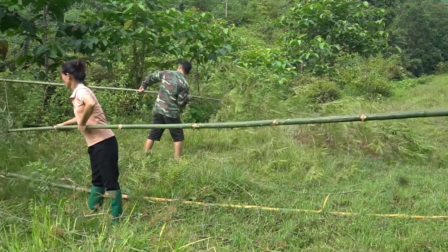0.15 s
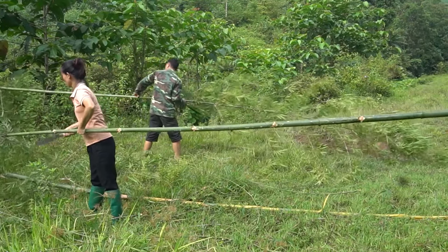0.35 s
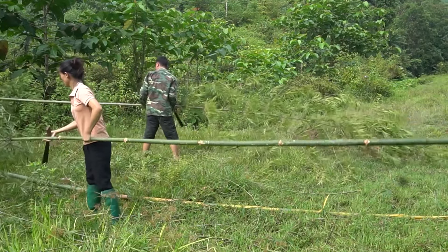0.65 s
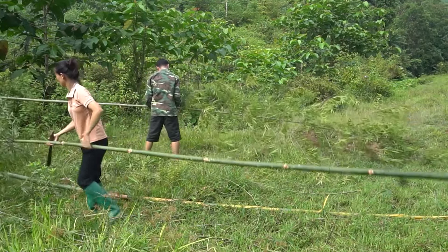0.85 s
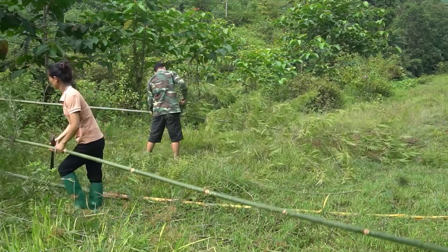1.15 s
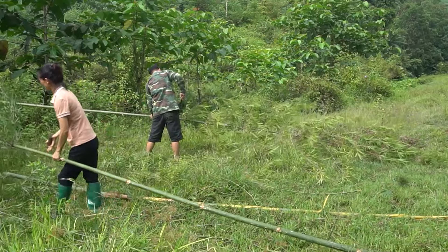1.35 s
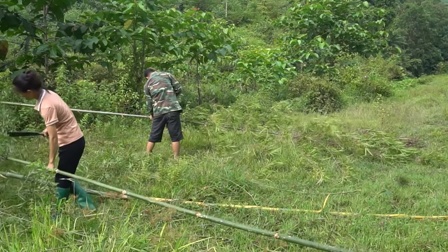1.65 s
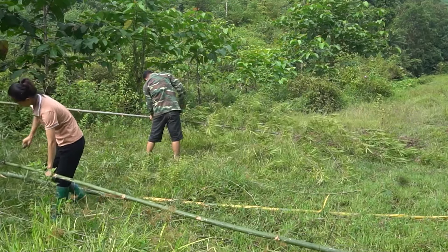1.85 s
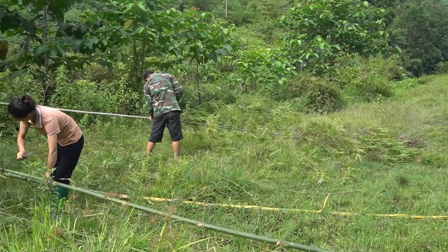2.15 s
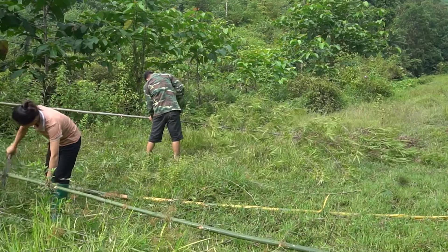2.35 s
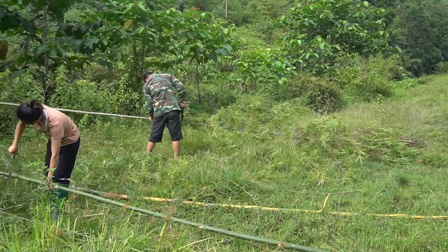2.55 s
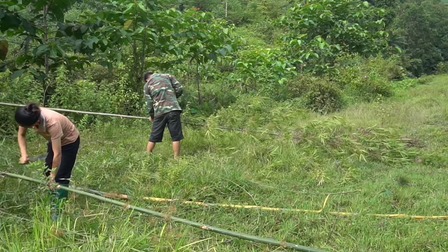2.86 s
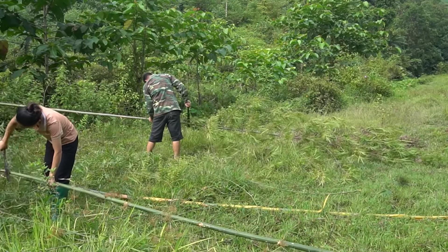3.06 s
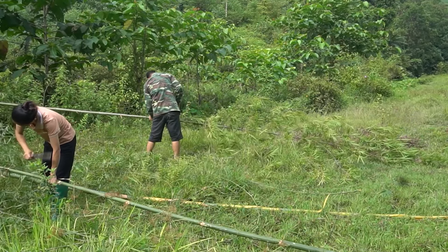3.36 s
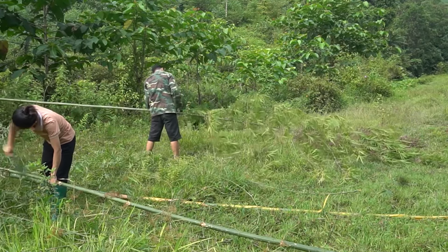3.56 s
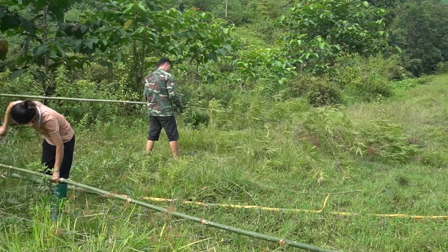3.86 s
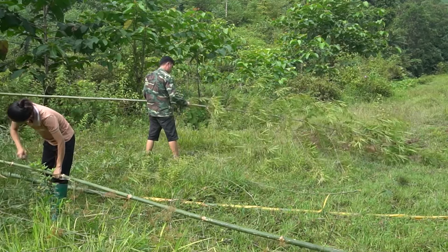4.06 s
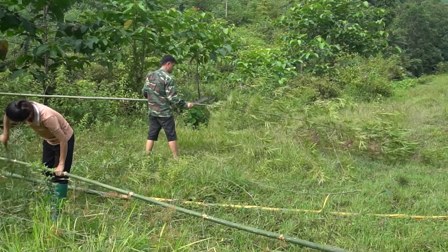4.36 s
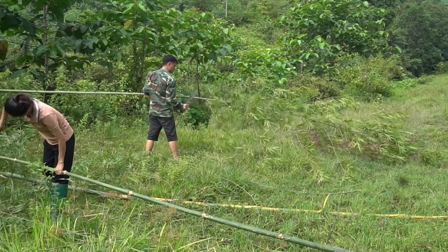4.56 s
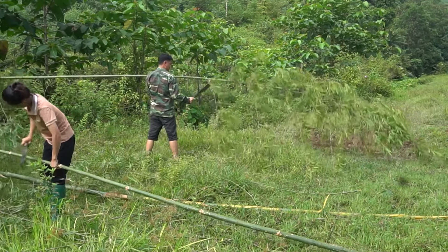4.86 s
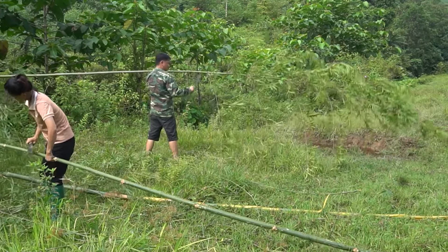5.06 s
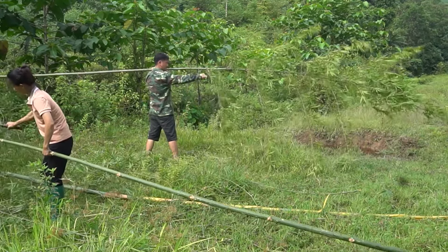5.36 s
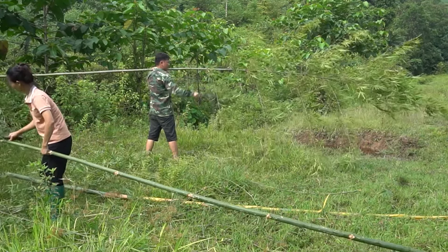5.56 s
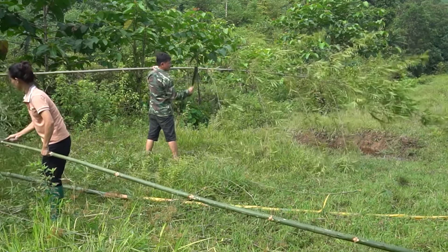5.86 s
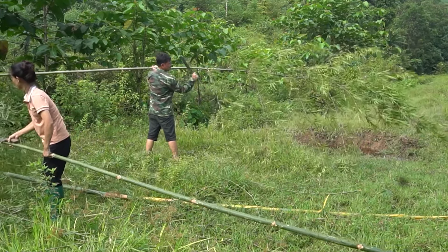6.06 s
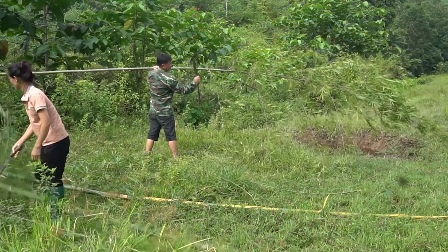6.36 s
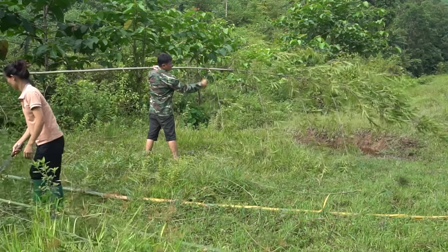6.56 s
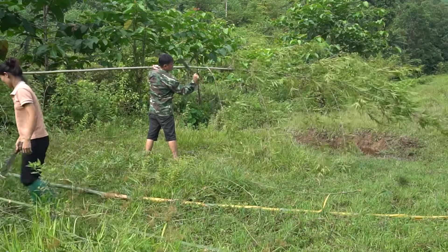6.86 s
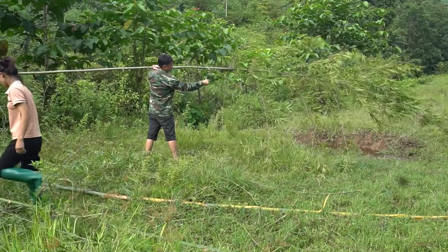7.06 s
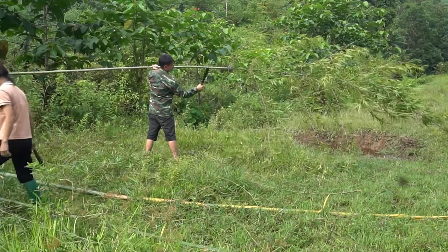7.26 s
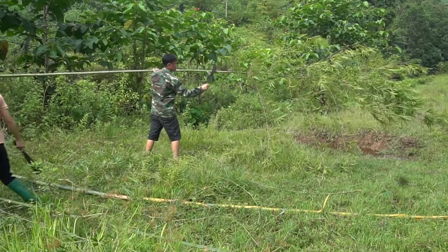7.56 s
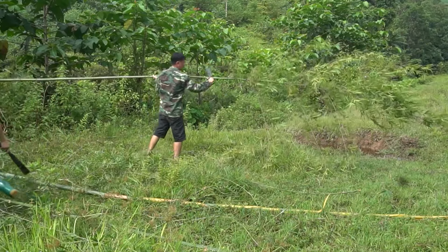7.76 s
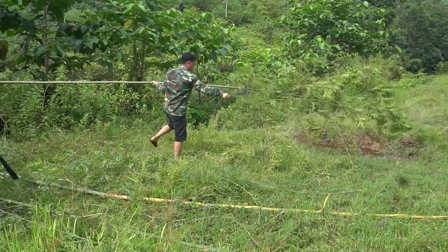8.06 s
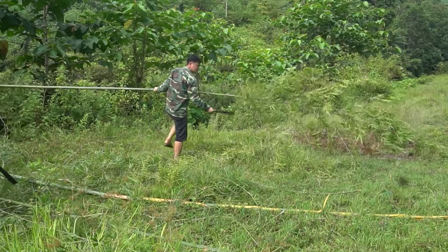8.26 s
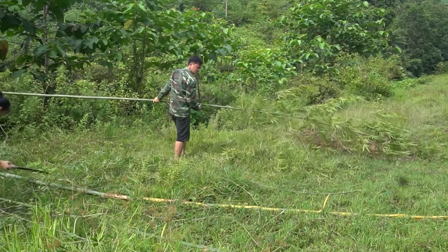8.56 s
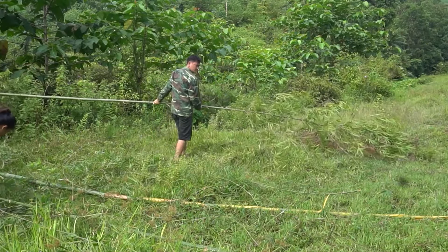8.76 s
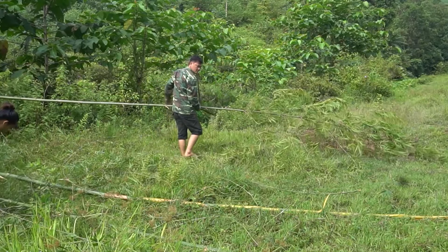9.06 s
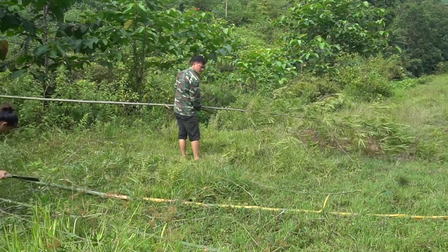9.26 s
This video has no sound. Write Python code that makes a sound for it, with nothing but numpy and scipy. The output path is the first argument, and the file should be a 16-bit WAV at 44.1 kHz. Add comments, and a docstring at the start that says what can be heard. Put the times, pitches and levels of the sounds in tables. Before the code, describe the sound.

A crack opens the scene, then a short lull with dragging and rustling before loud chops begin at two seconds. Blows follow irregularly, thickest with splintering and leaf swish around six and a half seconds, then a heavy pair at eight and a last light cluster near nine. Bamboo knocks hollowly, blades ping briefly. Steady insect buzz surrounds everything; the microphone is outdoors, fairly near, hearing the chopping slightly left.

```python
"""Leaves hiss, poles drag through grass and insects drone over a low rumble, all filtered and modulated noise.
Then heavy blades trim two bamboo poles, slightly to the left. Each crack is a burst of spiky noise with
damped pole-wall modes; it shakes twigs and leaves (decaying noise), and twigs tap the pole.
Late hollow knocks are sine packets with a noise rattle; some blows ring damped steel modes.
The trees return a faint diffuse noise tail."""
import sys
import numpy as np
from scipy import signal
from scipy.fft import rfft, irfft, next_fast_len
from scipy.io import wavfile
from scipy.ndimage import map_coordinates

SR = 44100
rng = np.random.default_rng(int(sys.argv[2]) if len(sys.argv) > 2 else 0)


def master(y):
    """Save y as 16-bit WAV."""
    cut = np.clip(np.atleast_2d(y).T, -1, 1)
    pcm = np.round(cut * 32767)  # scale
    wavfile.write(sys.argv[1], SR, pcm.astype(np.int16))


N = 414981


def amp(db):
    """dB to amplitude factor."""
    return 10 ** (np.asarray(db) / 20)


def unit(x):
    """Scale to rms 1."""
    return x / np.sqrt(np.mean(x ** 2) + 1e-20)


def peak(x):
    """Scale to peak 1."""
    return x / np.abs(x).max()


def along(points, hz):
    """Interpolate (Hz, value) points on a log frequency axis."""
    f, v = np.transpose(points)
    return np.interp(np.log(hz + 1), np.log(f + 1), v)


def curves(rows):
    """One value per sample for each column after the time."""
    s, *cols = np.transpose(rows)
    return [np.interp(np.arange(N) / SR, s, c) for c in cols]


def wobble(knots_per_s):
    """A smooth random curve."""
    knots = rng.standard_normal(int(N * knots_per_s / SR) + 4)
    return map_coordinates(knots, [np.arange(N) * knots_per_s / SR])


def filtered(x, response):
    """Multiply the spectrum of x by a response of frequency."""
    m = next_fast_len(N + 8192)
    hz = np.fft.rfftfreq(m, 1 / SR)
    return irfft(rfft(x, m) * response(hz), m)[..., :N]


def band(x, lo_hz, hi_hz):
    """Causal band-pass."""
    sos = signal.butter(2, [lo_hz, hi_hz], "bandpass", fs=SR, output="sos")
    return signal.sosfilt(sos, x)


def add(track, s, sound):
    """Mix a sound into the stereo track at time s."""
    start = round(s * SR)
    track[:, start:start + sound.shape[-1]] += sound


def ring(modes, t, scatter_db, weight_db=lambda hz: 0, turns=1):
    """Damped modes with random strengths, their phases scattered over turns of a cycle."""
    total = 0
    for hz, db, t60 in modes:
        level_db = db + weight_db(hz) + scatter_db * rng.standard_normal()
        phase = 2 * np.pi * (hz * t + turns * rng.random())
        total = total + amp(level_db - 60 * t / t60) * np.sin(phase)
    return total


# Left-right likeness of far sounds. Each row: frequency in Hz, correlation from 0 to 1.
FAR_LIKENESS = [(60, 0.81), (290, 0.98), (640, 0.44), (1400, 0.54), (3100, 0.047), (15000, .1)]


def rush(spectrum, grain_db=0, knots_per_s=100, likeness=FAR_LIKENESS):
    """Shaped stereo noise of rms 1, its level flickering; mid and side shares set the left-right likeness."""
    pair = rng.standard_normal((2, N)) * amp(grain_db * wobble(knots_per_s))

    def mid_side_response(hz):
        turn = np.arccos(np.clip(along(likeness, hz), -1, 1)) / 2
        return amp(along(spectrum, hz)) * [np.cos(turn), np.sin(turn)]

    mid, side = filtered(pair, mid_side_response)
    return unit(np.array([mid + side, mid - side]))


# Movement of leaves and poles. Each row: time in seconds, leaf hiss level in dB, drag level in dB.
LEAF_DRAG_LEVELS = [(0, -39.5, -45.5), (.3, -45, -41.5), (.72, -42.5, -44.5), (.88, -47, -50.5),
                    (1.05, -50.5, -48), (1.26, -48.5, -44.5), (1.4, -46, -49.5), (1.75, -49.5, -57.5),
                    (2.46, -49.5, -55), (2.62, -44, -36.5), (2.86, -50.5, -48.5), (3.72, -43, -63),
                    (3.86, -46, -48.5), (4.35, -44, -53), (4.78, -39, -46), (5.2, -49.5, -57),
                    (5.42, -39, -49), (5.95, -54, -65), (6.24, -51, -47.5), (6.58, -32.5, -39.5),
                    (6.84, -41, -43.5), (7.25, -45, -52), (7.45, -42.5, -50), (7.75, -50.5, -51.5),
                    (8.52, -41, -47.5), (8.9, -46.5, -56), (9.41, -48.5, -53.5)]
# Spectra of leaf hiss, drag and rumble. Each row: frequency in Hz, relative density in dB per Hz.
HISS_SPECTRUM = [(2500, -32), (4000, -5), (6500, -3), (8000, 0.5), (9400, -2), (11000, -1), (14000, -4),
                 (16000, -9)]
DRAG_SPECTRUM = [(350, 4), (700, -0.5), (1500, 1), (2800, 4.5), (4500, -7.5), (7000, -6.5)]
RUMBLE_SPECTRUM = [(15, -53), (25, -63), (128, -12), (161, -18), (212, -1.5), (238, 1.5), (289, -4.5),
                   (334, -8.5), (628, -24.5), (681, -10.5), (762, -22.5), (1020, -20), (1200, -58.5),
                   (1560, -74), (2640, -120)]


def field():
    """Leaves hiss and poles drag through the grass as level-shaped noise, over a low rumble that wavers."""
    hiss_db, drag_db = curves(LEAF_DRAG_LEVELS)
    hiss_db = hiss_db + 0.2 * wobble(8.9)
    hiss = amp(hiss_db) * rush(HISS_SPECTRUM, grain_db=1.5, knots_per_s=64)
    tugs_db = 1.3 * wobble(10)
    drag = amp(drag_db + tugs_db) * rush(DRAG_SPECTRUM, grain_db=2.0, knots_per_s=45)
    unrest_db = 1.6 * wobble(4)
    balance = amp([[.6], [-.6]])  # left, right
    rumble = amp(-49.0 + unrest_db) * rush(RUMBLE_SPECTRUM) * balance
    return hiss + drag + rumble


# The lower singer. Each row: time in seconds, level in dB.
SINGER_LEVELS = [(0.0, -45), (0.42, -68), (1.42, -56.5), (1.96, -53), (2.28, -53), (3.98, -53), (5.53, -53),
                 (6.58, -56), (7.28, -64), (8.25, -50), (9.41, -56.5)]


def insects():
    """Noise bands: a broad far chorus, two thin high bands, and a lower singer that comes and goes."""
    # Each pair: frequency in Hz, relative density in dB per Hz.
    chorus_spectrum = [(4100, -24.0), (4600, -11.5), (5100, -8.5), (5500, -16.5), (6000, -29)]
    thin_spectrum = [(7000, -20), (7700, -1), (8100, -9.5), (8600, -2.5), (9300, 0.5),
                     (9800, -7.5), (10500, -21)]
    singer_spectrum = [(3100, -21), (3380, 1.5), (3500, -3), (3620, -3.5), (3900, -49)]
    chorus = rush(chorus_spectrum, grain_db=0.5, knots_per_s=40)
    thin = rush(thin_spectrum)
    singer = rush(singer_spectrum, grain_db=2.5, knots_per_s=24)
    return amp(-45.0) * chorus + amp(-52.0) * thin + amp(curves(SINGER_LEVELS)[0]) * singer


# Bending modes of the pole's wall. Each row: frequency in Hz, relative level in dB, t60 in seconds
# (crack() scales the t60 with the crack's own).
WALL_MODES = [(1190, -26, 0.017), (1600, 2, 0.034), (1732, -6, 0.059), (1970, 5, 0.023), (2230, 10, 0.016),
              (2550, 2.5, 0.019), (2780, -1, 0.033), (3200, 0, 0.013)]
USUAL_T60_S = .03  # crack for which the wall t60 holds as listed
PUSH_SHARE, FOLLOW_DB = 0.36, -14  # push after first contact: t60 over the crack's, strength
BODY_DB = -17.5  # dull weight of a blow relative to its crack


def crack(db, treble_db, wall_db, wall_hz, t60_s):
    """Fibres break in a spiky noise burst; the contact rings the wall modes near the struck spot's pitch."""
    t = np.arange(SR // 14) / SR
    common, own = rng.standard_normal(len(t)), rng.standard_normal((2, len(t)))
    uneven_db = 3 * np.repeat(rng.standard_normal(len(t) // 30), 30)  # fibres give way unevenly
    onset = 1 - np.exp(-t / 0.00064)
    spikes = onset * amp(uneven_db - 60 * t / t60_s)

    edge_hz = 7500 * amp(.06 * min(treble_db, 0))  # a blunt contact is dull
    low = band(common + 0.087 * own, 2190, edge_hz) * spikes
    high = band(common + .7 * own, 6500, 14500) * spikes  # short waves reach the two ports less alike
    body = band(common * spikes, 600, 1540)

    scaled_modes = np.multiply(WALL_MODES, [1, 1, t60_s / USUAL_T60_S])
    modes = ring(scaled_modes, t, 4.6, lambda hz: -6 * (np.log2(hz / wall_hz) / 0.23) ** 2, turns=0.35)
    follow = amp(FOLLOW_DB + uneven_db - 60 * t / (PUSH_SHARE * t60_s))
    push = (t == 0) + (common + 0.22 * own) * follow
    wall = signal.fftconvolve(push, modes[None], axes=1)[:, :len(t)]
    wall = band(wall, 1000, 7000)

    burst = peak(low) + amp(BODY_DB) * peak(body) + amp(treble_db) * peak(high)
    return amp(db) * (burst + amp(wall_db) * peak(wall))


TUBE_MODE = (750, 3.3, 0.065)  # the pole's hollow: Hz, dB, t60 in seconds
CLATTER_PER_S, CLATTER_DB = 90, 8


def clatter(shaking):
    """Shaken twigs tap the pole at random moments and ring its wall and hollow weakly."""
    hits = rng.random(N) < CLATTER_PER_S / SR
    taps = hits * amp(3.84 * rng.standard_normal(N)) * shaking
    t = np.arange(SR // 20) / SR
    wall = np.array([ring([*WALL_MODES, TUBE_MODE], t, 3.1, turns=0.29) for _ in range(2)])
    return amp(CLATTER_DB) * signal.fftconvolve(taps[None], peak(wall), axes=1)[:, :N]


# Cracks. Each row: time in seconds, level in dB, treble relative to that in dB,
# wall ring relative to that in dB, wall centre in Hz, t60 in seconds.
CRACK_ROWS = [(0.0398, -7, -6, -1.5, 2220, 0.027), (0.078, -17, -4, -20, 1930, 0.075),
              (0.0893, -19, 0, -2, 2070, .022), (0.1395, -24.5, 7.5, -9, 1600, 0.096),
              (0.2964, -14, -36, 8.5, 1850, .025), (0.5084, -41, 9, 0, 1600, 0.052),
              (0.7474, -30.5, 1, -6, 1600, 0.04), (1.9929, -3, 4.5, -27, 1670, 0.022),
              (2.0864, -26.5, 0, -20, 2330, 0.043), (2.4467, -9, -9, 6.5, 2300, 0.047),
              (2.4588, -17.5, 11.5, 7, 2130, 0.0098), (2.4942, -23, -12, -4, 2290, 0.075),
              (2.5313, -2, -21, -10, 1840, 0.058), (2.5381, -6, 1.5, 0, 1970, 0.024),
              (2.576, -22, -5, 1, 1960, 0.043), (3.0695, -13.5, 1, 6.5, 2350, 0.061),
              (3.0844, -3, 1, -20, 2540, 0.028), (3.6876, -10.5, -5, 2.5, 2420, 0.036),
              (3.7048, -16, 0, 7.5, 2130, 0.046), (3.714, -12, -2, -7, 2060, 0.036),
              (3.7317, -18, -1, 6, 2090, 0.039), (3.8382, -24, -2, 10, 1830, 0.0085),
              (4.159, -7.5, 1, -11.5, 1680, 0.027), (4.2147, -21.5, 14.5, -20, 1600, 0.096),
              (4.2195, -4, -11, -11, 2540, 0.038), (4.4398, -10, 1, 5, 2070, 0.021),
              (4.4512, -25, 11, 16.5, 2000, .042), (4.4616, -34, -4, 20.5, 2100, 0.037),
              (4.4754, -32, -8, 12, 2050, .03), (4.506, -22, 2, -16, 1590, .027),
              (4.5514, -12, -21, 0, 1600, 0.036), (4.7126, -32, 11, -16, 1590, .025),
              (5.2123, -13, -22, -0.5, 2150, 0.04), (5.2894, -13.5, 2.5, -2, 1760, 0.017),
              (5.3536, -8, -2, -15, 1300, 0.027), (5.3872, -8, 1.5, -18, 1400, 0.029),
              (5.4139, -4.5, -2.5, -16, 2800, .05), (5.4397, -27, 16.5, -19, 2780, .027),
              (5.487, -29.5, 12.5, 5, 2140, .025), (5.9639, -26.5, -56, 13.5, 1760, 0.017),
              (6.081, -24, -11, -4, 2680, 0.018), (6.2519, -6.5, 2.5, -8, 2100, 0.026),
              (6.2624, -17.5, 14, 7.5, 1770, 0.013), (6.416, -7.5, -2, -44, 2460, .033),
              (6.4215, 1, -18, -43, 2550, 0.012), (6.43, -25.5, 6, 5.5, 1550, 0.069),
              (6.477, -13.5, -3, -28, 2060, 0.037), (6.5172, -19.5, 2, -5, 1920, 0.026),
              (6.54, -16, 2, -25, 2160, 0.038), (6.562, -14, -2, -8.5, 1250, 0.027),
              (6.5805, -17.5, -5, -16, 2140, 0.018), (6.6694, -2.5, 8, -14.5, 1690, 0.042),
              (6.77, -22, -6, -41, 2390, 0.041), (6.988, -32, -9.5, 2, 1980, 0.046),
              (7.0408, -28, 3, -11, 2000, 0.045), (7.083, -9, 4.5, -30, 1680, 0.025),
              (7.0868, -23, 24, 5, 1670, 0.033), (7.3912, -30.5, 3, -26, 2300, 0.066),
              (7.6849, -31, -10, -4.5, 2770, 0.036), (7.7854, -38, -6, 4.5, 2240, 0.039),
              (8.0275, -2, -2.5, -28, 2960, 0.022), (8.0343, -2.5, 3, -36, 2720, 0.048),
              (8.0854, -4, -1, -13, 1910, 0.041), (8.0986, -28, 25.5, -9, 1910, 0.039),
              (8.592, -35, 13, -29, 2580, 0.019), (8.7237, -19, -13, -6, 1530, 0.035),
              (8.734, -41, -6, 17, 1540, .033), (8.895, -28.5, 3, -16, 2500, .027),
              (8.9088, -22, 8, -5, 2640, 0.044), (8.916, -9, 1.5, 4, 1800, 0.017),
              (8.94, -22, 4, 1.5, 1650, 0.046)]
# Spectra of shaken twigs and leaves. Each row: frequency in Hz, relative density in dB per Hz.
TWIG_SPECTRUM = [(400, -11), (800, -4), (2200, -1.5), (4500, -3.5), (7000, -15.5)]
LEAF_SPECTRUM = [(3500, -11.5), (6000, -1), (9000, -0.5), (15800, -3.5)]
# Left-right likeness of near sounds. Each row: frequency in Hz, correlation from 0 to 1.
NEAR_LIKENESS = [(500, 1), (2500, 0.75), (6000, 0.032), (15000, 0.49)]
TWIG_DB, LEAF_DB = -27.5, -24  # shaking after a 0 dB crack of usual t60 (leaves: at 0 dB treble)
SHAKE_GROWS, LONGER_DB = 0.73, 2.5  # dB per dB of crack, dB per doubling of its t60


def blows():
    """Each crack also adds power to the shaking of twigs and leaves, which dies away as noise."""
    track, shaken_power = np.zeros((2, N + SR)), np.zeros((2, N))
    for s, db, treble_db, wall_db, wall_hz, t60_s in CRACK_ROWS:
        add(track, s - .0007, crack(db, treble_db, wall_db, wall_hz, t60_s))
        growth_db = SHAKE_GROWS * db + LONGER_DB * np.log2(t60_s / USUAL_T60_S)
        shake_db = growth_db + np.array([TWIG_DB, LEAF_DB + 0.35 * treble_db])
        shaken_power[:, round(s * SR)] += amp(2 * shake_db)
    after = np.arange(SR) / SR
    t60_s = np.array([[.4], [.45]])  # twigs, leaves
    power_fade = amp(-120 * after / t60_s) * (1 - np.exp(-after / 0.00059))
    power = signal.fftconvolve(shaken_power, power_fade, axes=1)[:, :N]
    twig_level, leaf_level = np.sqrt(np.abs(power))
    twigs = twig_level * rush(TWIG_SPECTRUM, grain_db=4.0, knots_per_s=210, likeness=NEAR_LIKENESS)
    leaves = leaf_level * rush(LEAF_SPECTRUM, grain_db=2, knots_per_s=250, likeness=NEAR_LIKENESS)
    return track[:, :N] + twigs + leaves + clatter(twig_level)


def trees(x):
    """A faint diffuse answer from the trees around: x convolved with a decaying noise tail."""
    t = np.arange(SR // 3) / SR
    tail = band(rng.standard_normal((2, len(t))), 470, 4200) * amp(-60 * t / 0.53) * (t > .008)
    return signal.fftconvolve(x, tail / np.linalg.norm(tail[0]), axes=1)[:, :N]


# Hollow knocks of the pole. Each row: time in seconds, level in dB, pitch in Hz.
KNOCKS = [(0.16, -34.5, 750), (0.53, -55, 770), (0.579, -39.5, 805), (0.678, -38, 784), (0.779, -25.5, 790),
          (2.008, -24.5, 760), (2.019, -21.5, 770), (2.04, -31, 690), (2.544, -24, 670), (2.551, -21, 820),
          (2.561, -18, 744), (2.575, -21.5, 700), (3.099, -27.5, 790), (3.11, -25, 780), (3.123, -30, 730),
          (3.143, -27, 750), (3.7, -34, 810), (3.729, -32, 806), (4.173, -30, 840), (4.244, -26, 760),
          (4.574, -26, 764), (5.23, -46, 775), (5.39, -34, 800), (5.404, -33, 750), (5.44, -27.5, 676),
          (5.463, -32.5, 776), (6.102, -39.5, 796), (6.268, -21.5, 776), (6.425, -42, 684),
          (6.595, -39, 730), (6.683, -22.5, 620), (6.702, -30, 730), (6.861, -40.5, 746), (7.005, -37, 730),
          (7.106, -37, 716), (7.475, -30.5, 516), (7.81, -37.5, 724), (8.053, -32, 740),
          (8.111, -22.5, 750), (8.135, -31, 595), (8.735, -33, 764), (8.752, -33, 820)]


def hollow():
    """Low bending waves travel slowly along the pole and arrive late: a soft packet and a rough woody rattle."""
    track, t = np.zeros((2, N + SR)), np.arange(SR // 8) / SR
    for s, db, hz in KNOCKS:
        swell = t / 0.0014 * np.exp(1 - t / 0.0019)
        packet = swell * np.sin(2 * np.pi * (hz * t + rng.random()))
        rough = unit(band(rng.standard_normal(len(t)), 0.78 * hz, 1.16 * hz))
        rattle = rough * amp(-9.5 - 60 * t / 0.12) * (1 - np.exp(-t / 0.004))
        add(track, s - .001, amp(db) * (packet + rattle))
    balance = amp([[.8], [-.8]])  # left, right
    return band(track[:, :N], 390, 3000) * balance  # a thin pole radiates no bass


# Modes of the blade. Each row: frequency in Hz, relative level in dB, t60 in seconds.
STEEL_MODES = [(4650, -6, .06), (5830, -6, .11), (6720, -8, .07), (8100, 0, .06), (9380, -2, .07),
               (10750, -8, .07), (12270, -2, .055), (13720, -1, .09)]
# Blade rings. Each row: start in seconds, level in dB, favoured frequency in Hz.
BLADE_RINGS = [(2.4463, -19, 12200), (2.577, -24, 8240), (3.688, -26.5, 10700), (3.714, -27, 4650),
               (3.732, -25.5, 5800), (4.4393, -13.5, 11900), (4.5067, -32, 5870), (4.5494, -17, 6720),
               (5.2116, -16, 4900), (5.2899, -23, 8030), (5.4146, -29.5, 12200), (6.2496, -19.5, 6800),
               (7.0884, -16, 13700), (8.0353, -18, 7930), (8.0845, -14, 5750), (8.0984, -29, 7910),
               (8.915, -20.5, 5830)]


def blade():
    """The steel rings briefly, strongest in the modes that the blow favours."""
    track, t = np.zeros((2, N + SR)), np.arange(SR // 5) / SR
    for s, db, favoured_hz in BLADE_RINGS:
        modes = ring(STEEL_MODES, t, 2, lambda hz: -14 * np.abs(np.log2(hz / favoured_hz)) / .45)
        add(track, s, amp(db) * (1 - np.exp(-t / 0.00023)) * modes)
    return track[:, :N]


LEFT_DB, LEAD_S = 3, .00001  # the left port hears the work louder and earlier than the right by this


def scene():
    """The work, placed to the left, with its answer from the trees, the insects and the field."""
    work = (blows() + blade() + hollow()) * amp([[LEFT_DB / 2], [-LEFT_DB / 2]])
    work = filtered(work, lambda hz: np.exp(1j * np.pi * hz * [[LEAD_S], [-LEAD_S]]))
    return field() + insects() + work + amp(-23.5) * trees(work)


TOP_HZ = 16700  # nothing passes from here up


def record(dry):
    """Gain control ducks after loud blows, peaks saturate softly, and both ends of the band fall away."""
    keep = np.exp(-1 / (.15 * SR))  # 0.15 s averaging
    power = signal.lfilter([1 - keep], [1, -keep], np.mean(dry ** 2, 0))
    ducked = dry * (1 + power / amp(2 * -33)) ** -.25  # knee at -33 dB rms
    rounded = ducked / (1 + np.abs(ducked / .8) ** 3) ** (1 / 3)

    def band_ends(hz):
        low_cut = hz / (hz - 60j)
        return low_cut * amp(-22 * (hz > 15800)) * (hz < TOP_HZ)

    return filtered(rounded, band_ends)


dry = scene()
out = record(dry)
master(out)
```